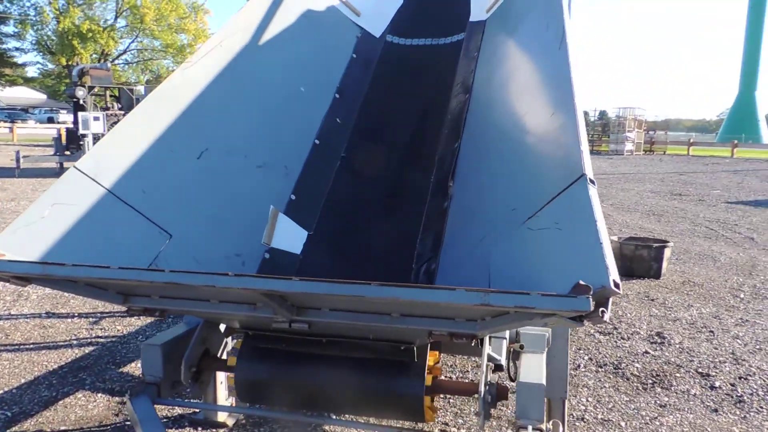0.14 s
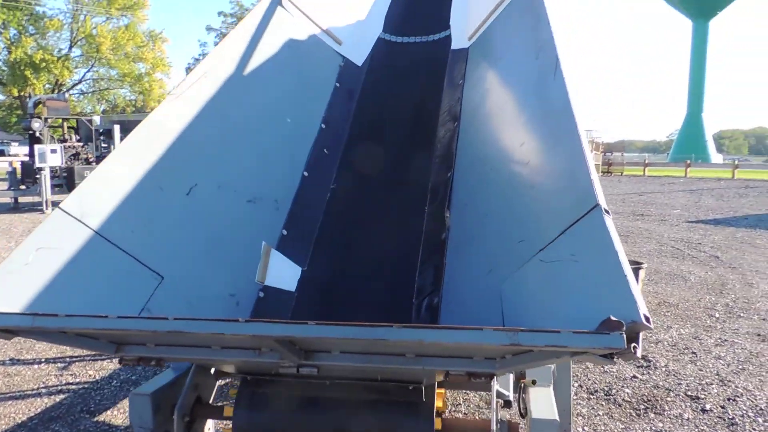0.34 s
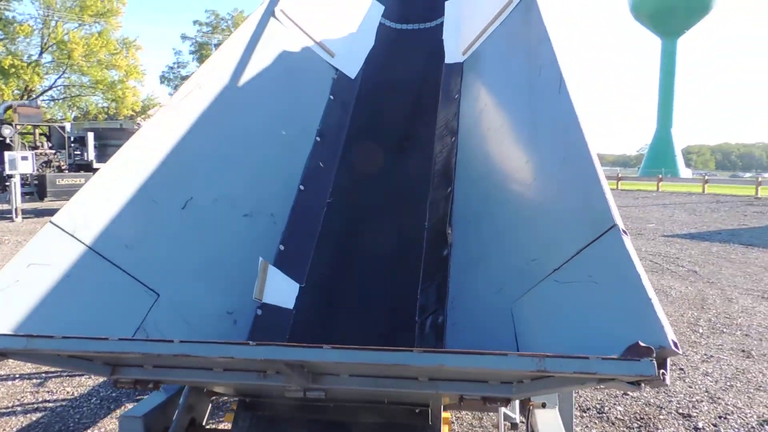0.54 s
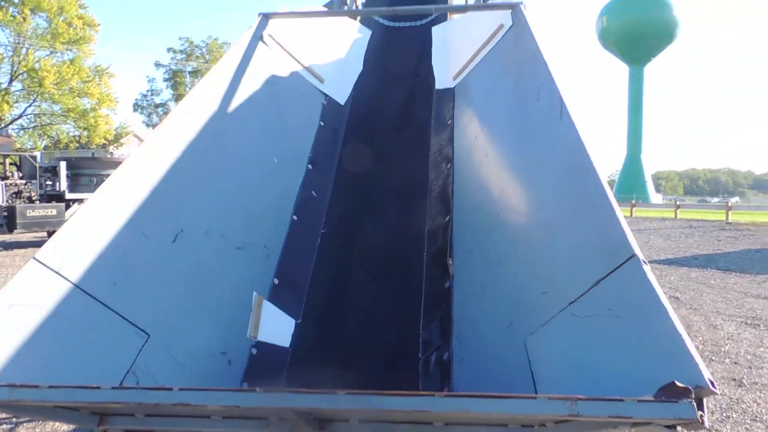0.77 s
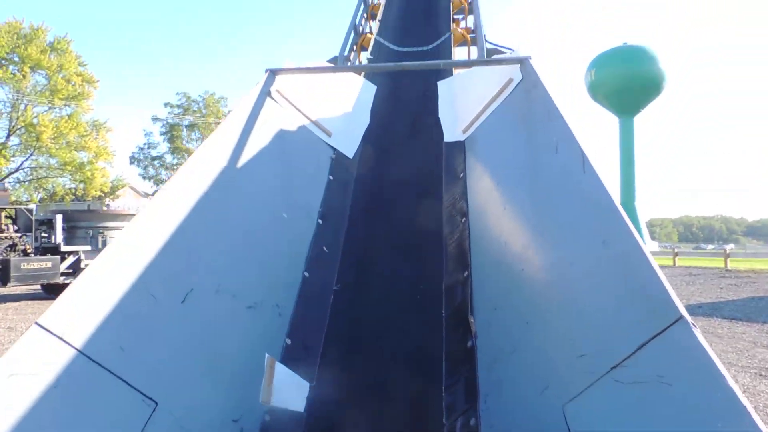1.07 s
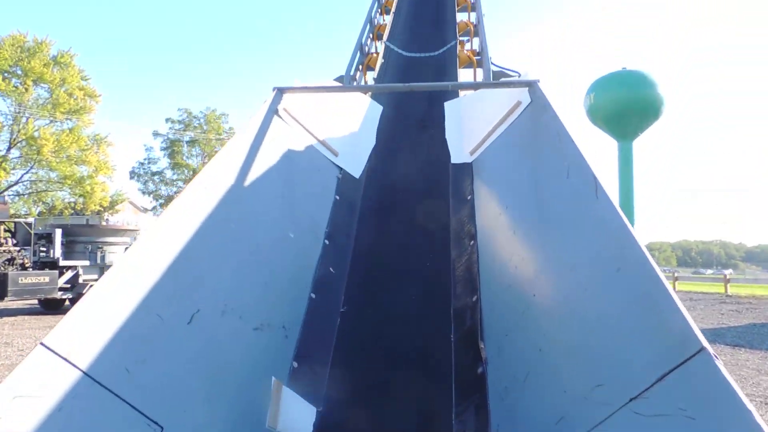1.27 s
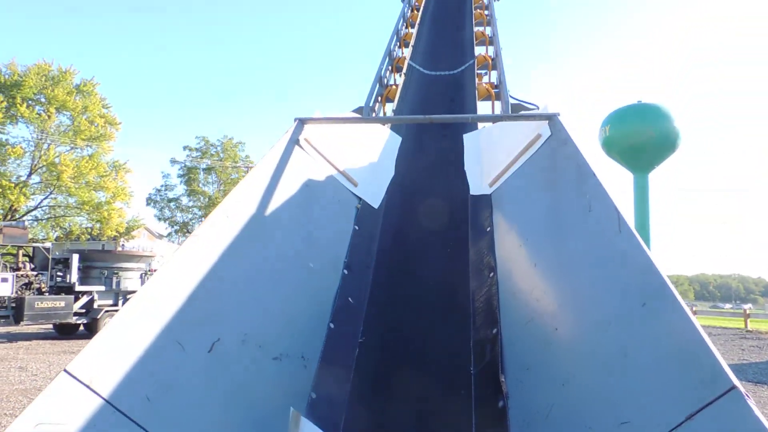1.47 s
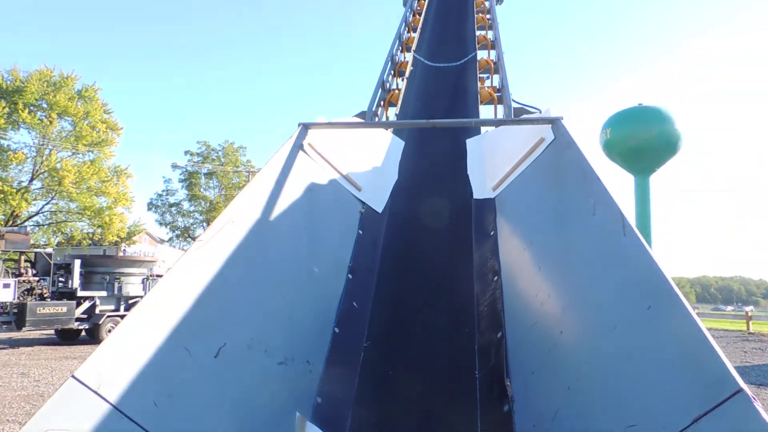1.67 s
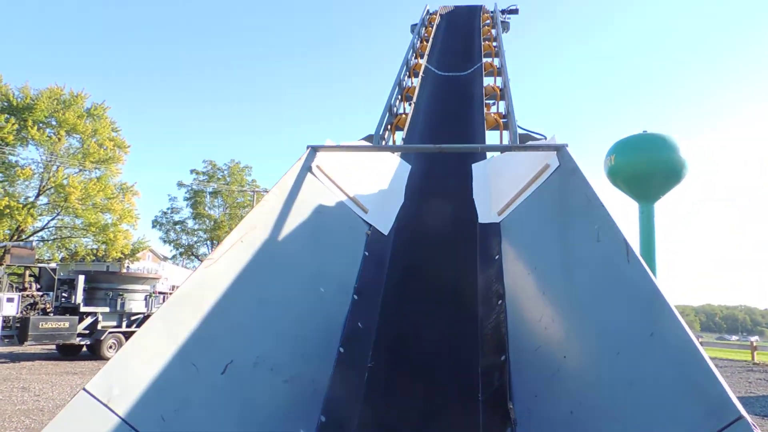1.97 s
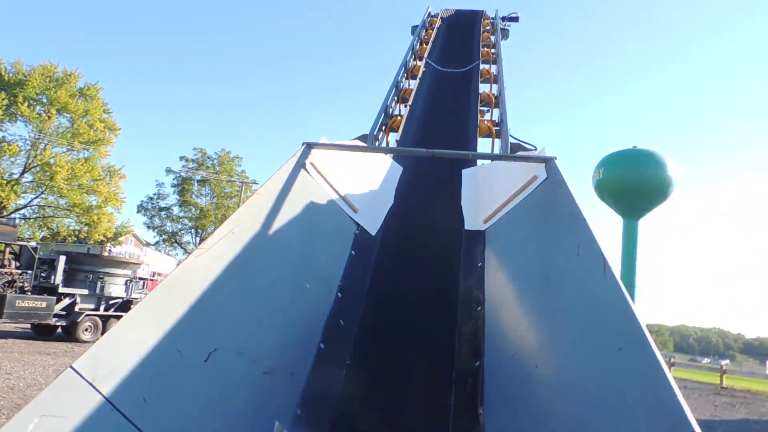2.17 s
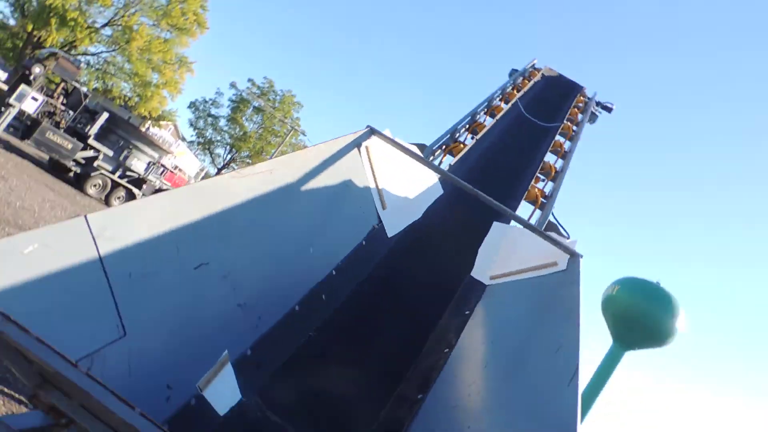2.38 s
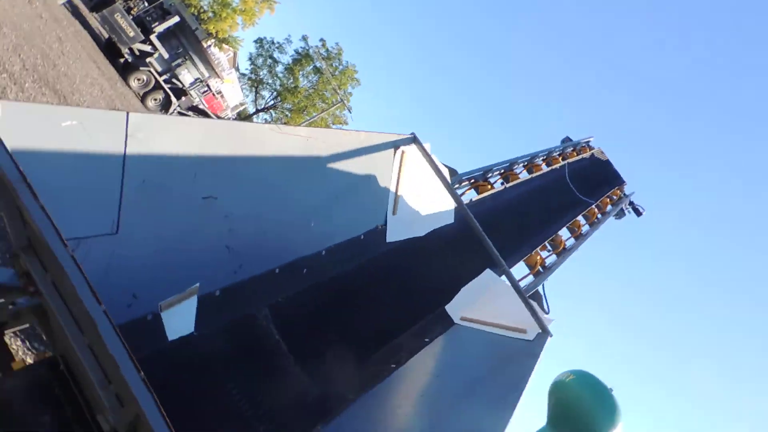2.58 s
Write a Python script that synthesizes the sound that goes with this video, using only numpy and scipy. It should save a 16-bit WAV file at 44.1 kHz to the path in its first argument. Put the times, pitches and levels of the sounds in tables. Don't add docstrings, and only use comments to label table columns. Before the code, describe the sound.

A belt conveyor runs throughout, close and outdoors: a rapid, uneven low engine throb with faint gear whine, rumbling belt, resonant hopper plates and gritty roller hiss. Rumble swells around 1.0 to 1.3 s, then eases. Sharp steel clacks land at about 0.3, 0.75, 1.2, 1.65, 2.1 and 2.55 s, rattling briefly with tiny metallic chimes. Grit ticks cluster at 0.4-0.95 s; fuller soft thuds fall near 2.2 and 2.5 s.

```python
import sys
import numpy as np
from scipy import signal
from scipy.fft import rfft, irfft
from scipy.io import wavfile
from scipy.ndimage import uniform_filter1d

SR = 44100
rng = np.random.default_rng(int(sys.argv[2]) if len(sys.argv) > 2 else 0)


def unload_audio(sound):
    columns = np.transpose(np.atleast_2d(sound))
    steps = np.round(np.clip(columns, -1, 1) * 32767)
    wavfile.write(sys.argv[1], SR, steps.astype(np.int16))


def volts_from_db(level):
    exponent = np.asarray(level, float) / 20
    return 10 ** exponent


N = 120393
T = np.arange(N) / SR


def evened(x):
    return x / np.sqrt(np.mean(x ** 2) + 1e-20)


def read(points, hz):
    f, value = np.transpose(points)
    return np.interp(np.log(hz + 1), np.log(f + 1), value)


def curve(table, col):
    rows = np.array(table)
    return np.interp(T, rows[:, 0], rows[:, col])


def coloured(x, points):
    hz = np.fft.rfftfreq(x.shape[-1], 1 / SR)
    return irfft(rfft(x) * volts_from_db(read(points, hz)), x.shape[-1])


def drift(hz):
    return evened(coloured(rng.standard_normal(N), [(hz, 0), (4 * hz, -40), (40 * hz, -120)]))


def resonate(x, hz, width):
    r = np.exp(-np.pi * width / SR)
    angle = 2 * np.pi * hz / SR
    ringing = signal.lfilter([1, 0, -1], [1, -2 * r * np.cos(angle), r * r], x)
    return np.sqrt(1 - r) * ringing / (2 * np.sin(angle))


def smoothed(x, first, second, axis=-1):
    return uniform_filter1d(uniform_filter1d(x, size=first, axis=axis), size=second, axis=axis)


def noise(points, patchy_db, flicker_db):
    frames = N // 128 + 5
    a, b, c, d, patches = rng.standard_normal((frames, 257, 5)).T
    patches = evened(uniform_filter1d(uniform_filter1d(patches, size=6, axis=0), size=20, axis=1))
    flicker = evened(uniform_filter1d(rng.standard_normal(frames), size=3))
    z = np.array([a + 1j * b, c + 1j * d]) * volts_from_db(patchy_db * patches + flicker_db * flicker)
    raw = signal.istft(z, nperseg=512, noverlap=384)[1][:, :N]
    return evened(coloured(raw, points))


def add(mix, s, sound):
    part = mix[..., max(round(s * SR), 0):][..., :sound.shape[-1]]
    part += sound[..., :part.shape[-1]]


CYCLE_HZ = 28.93
TWIN_GAP, PAIR_AT = .375, .56
PUFF_SKEW, SHAFT_LAG = 2.2, 2.1
WAVER_PER_ORDER, WAVER_MAX = .02, .22
# order (multiple of the engine cycle), level_db
ORDER = [(1, -13.5), (2, 0.5), (3, -2), (4, -23), (5, -0.5), (6, 2.5), (7, -26), (8, -9.5), (9, -9),
         (10, -9.5), (11, -5.5), (12, -14), (13, -12.5), (14, -22.5), (15, -26.5), (16, -20), (17, -23),
         (18, -22), (19, -15.5), (20, -21.5), (21, -16.5), (22, -47.5), (23, -43.5), (24, -10), (25, -30),
         (26, -14.5)]
# start_s, level_db, shading_db (hopper in the way of the upper orders)
NEAR = [
    (0.0, -19, -4.5),
    (0.04, -20.5, -5),
    (0.36, -21, -3),
    (0.39, -21, 2),
    (1.16, -17, -1.5),
    (1.17, -20, 2),
    (2.07, -18, 1),
    (2.2, -18.5, -1.5),
    (2.73, -19, 2.5),
]
# pitch_hz, level_db
WHINE = [
    (1389, -37.5),
    (2026, -45.5),
    (2141, -41),
]


def engine():
    turn = 2 * np.pi * CYCLE_HZ * T
    shade = curve(NEAR, col=2)
    puffs = np.zeros(N)
    for k, db in ORDER:
        side = np.sign(np.cos(np.pi * k * TWIN_GAP))
        waver = min(WAVER_PER_ORDER * k, WAVER_MAX)
        lag = SHAFT_LAG * (k > 7 and k % 2 == 0) + 2 * np.pi * rng.random() * (k > 12)
        wave = np.cos(k * (turn - 2 * np.pi * PAIR_AT) + PUFF_SKEW - lag + waver * drift(hz=3.))
        level = volts_from_db(db + shade * min(k / 10, 1) ** 2 + 4.3 * waver * drift(hz=1.9))
        puffs += side * level * wave
    out = 1.16 * volts_from_db(curve(NEAR, col=1)) * evened(puffs)
    for hz, db in WHINE:
        level = volts_from_db(db + 1.5 + 1.3 * drift(hz=6.0))
        out += level * np.cos(2 * np.pi * hz * T + .5 * drift(hz=1.9))
    return out


# start_s, belt_level_db, hiss_level_db
LOAD = [
    (0.0, -26, -32.5),
    (0.33, -27, -35),
    (0.49, -22.5, -31),
    (0.73, -23, -30),
    (1.01, -19.5, -31),
    (1.34, -24.5, -32.5),
    (1.58, -22.5, -34),
    (2.03, -22.5, -32),
    (2.55, -21.5, -33),
    (2.73, -24.5, -32.5),
]
# pitch_hz, level_db (per Hz)
RUMBLE = [(18, -33), (30, -11), (113, -6.5), (167, -2), (221, -5), (317, -2.5), (418, -14.5), (718, -19),
          (1500, -16.5), (1950, -30), (3300, -120)]
# pitch_hz, width_hz, level_db
PLATES = [
    (592, 100, -1.5),
    (721, 79, 9.5),
    (824.5, 27, 1),
    (900, 41, -76),
]
# pitch_hz, level_db (per Hz)
HISS = [(600, -18), (1100, -10), (2100, -7), (2750, -9), (3200, -15.5), (7000, -17.5), (14150, -22),
        (14450, -70)]


def belt():
    load = curve(LOAD, col=1)
    low = noise(RUMBLE, patchy_db=1.1, flicker_db=.6)
    plates = evened(sum(volts_from_db(db) * resonate(low, hz, width) for hz, width, db in PLATES))
    hits = rng.random(N) < 1200. / SR
    grain_level = volts_from_db(2.2 * np.minimum(rng.exponential(1, N), 3))
    grit = hits * grain_level * rng.choice([-1, 1], (2, N))
    hiss = noise(HISS, patchy_db=1.5, flicker_db=0.86) + 0.24 * evened(coloured(grit, HISS))
    return volts_from_db(load - 6.5) * low + volts_from_db(load - 1) * plates + volts_from_db(curve(LOAD, col=2) + 2.5) * hiss


# start_s, pitch_hz, level_db, length_s
CHIMES = [(0, 7200, -32.5, 0.026), (0, 10600, -41, 0.03), (0.293, 7300, -44, 0.048),
          (0.295, 2470, -33.5, 0.06), (0.743, 7460, -34, 0.037), (.75, 4974, -33, 0.06),
          (0.754, 4400, -46, .03), (1.663, 10800, -38.5, 0.078), (2.571, 10500, -36, 0.04),
          (1.205, 5110, -38, 0.086), (1.195, 7450, -27, .028), (1.207, 8340, -32, .06),
          (1.202, 11200, -33, .015), (1.672, 2510, -30, 0.062), (1.66, 4560, -33.5, 0.091),
          (1.649, 5020, -26.5, 0.068), (1.66, 5216, -36, 0.049), (1.655, 7400, -33, 0.065),
          (1.649, 12170, -32, 0.051), (1.66, 9200, -30, 0.019), (2.11, 7192, -35, .06),
          (2.107, 7650, -29, 0.053), (2.11, 8210, -38, 0.022), (2.113, 4600, -40, 0.1),
          (2.111, 11900, -33, 0.049), (2.575, 5030, -32.5, 0.043), (2.578, 7300, -40.5, .03),
          (2.571, 8200, -36.5, 0.075), (2.58, 8900, -42, .03)]


def chime(start, hz, db, length):
    t = np.arange(0, .25, 1 / SR)
    shaken = evened(resonate(rng.standard_normal((2, len(t))), hz, 160.))
    tone = np.cos(2 * np.pi * (hz * t + rng.random((2, 1)))) + .75 * shaken
    return start, volts_from_db(db + 1.5) * tone * np.minimum(t / 0.0026, 1) * np.exp(-(t / length) ** 2)


def knock(start, db, hz, decay_s, spread):
    t = np.arange(0, .08, 1 / SR)
    narrow = resonate(rng.standard_normal((2, len(t))), hz, spread * hz)
    puff = evened(resonate(narrow, hz, 2 * spread * hz))
    return start, volts_from_db(db) * puff * np.exp(-t / decay_s) * np.minimum(t / (0.096 * decay_s), 1)


# start_s, level_db, pitch_hz
TICKS = [(0.0044, -13.5, 6800), (0.39, -12, 4470), (0.43, -11, 3050), (0.624, -13, 6320),
         (0.6529, -9.5, 5800), (0.6724, -19, 3800), (0.7236, -18, 3540), (0.7944, -9, 4730),
         (0.8274, -12, 3190), (0.8614, -13, 6480), (0.8914, -12, 3350), (0.9363, -8, 3100),
         (2.0677, -15, 3210), (2.1544, -16, 6700), (2.6344, -8, 3120)]


def tick(start, db, hz):
    return knock(start, min(db, -13) - 13, hz, decay_s=.003, spread=.7)


CRACK_DB, WASH_DB = -6.5, -3
RATTLE_S, WASH_T60, BODY_T60 = 0.041, .12, .02
BODY_MODES = 45
CENTRED = 0.62
# start_s, crack_level_db, body_level_db, brightness_db (per octave), blow_s
CLACKS = [
    (0.2871, -8, -14, 0.5, 0.0028),
    (0.742, -8.5, -9.5, 0.5, 0.0066),
    (1.1963, -6.5, -10.5, -1, 0.0056),
    (1.6526, -8.5, -13, -1.5, 0.0056),
    (2.11, -5, -15, -2.5, 0.0036),
    (2.567, -7.5, -12.5, -0.5, 0.0032),
]
# pitch_hz, level_db (per Hz)
CRACK = [(1500, -35), (2400, -8.5), (3200, -6), (4200, -5), (5600, -7.5), (7500, -2), (9500, -14),
         (14000, -18)]


def clack(start, db, body_db, bright_db, blow_s):
    t = np.arange(0, .3, 1 / SR)
    colour = [(hz, d + bright_db * np.log2(hz / 5000)) for hz, d in CRACK]
    burst, shake, wash = rng.standard_normal((3, 2, len(t)))
    lumps = volts_from_db(3.8 * evened(smoothed(rng.standard_normal(len(t)), 20, 12)))
    blow = np.exp(-(t / blow_s) ** 3) * lumps
    crack = evened(coloured(burst, colour)) * blow * np.minimum(t / .0006, 1)

    rattle = lumps * np.exp(-(t / RATTLE_S) ** 2)
    drive = coloured(shake, colour) * (.5 * blow + 0.25 * rattle)
    modes = np.linspace(3000, 12500, BODY_MODES) + rng.uniform(-70, 70, BODY_MODES)
    rings = sum(resonate(drive, hz, 2.2 / BODY_T60) * (-1) ** k for k, hz in enumerate(modes)) / 3
    tail = evened(coloured(wash, colour)) * volts_from_db(WASH_DB - 60 * t / WASH_T60)

    one, other = volts_from_db(db) * (volts_from_db(CRACK_DB) * crack + volts_from_db(body_db) * (rings + tail))
    return start, np.array([one, CENTRED * one + np.sqrt(1 - CENTRED ** 2) * other])


# start_s, level_db, pitch_hz
THUDS = [
    (0.5294, -6, 950),
    (0.9478, -8, 1180),
    (1.6894, -7.5, 1370),
    (2.0699, -7.5, 1380),
    (2.1144, -6, 950),
    (2.1545, -9, 1120),
    (2.2044, 1, 950),
    (2.2244, -15, 904),
    (2.5012, 6, 910),
    (2.6077, -8, 930),
]


def thud(start, db, hz):
    return knock(start, min(db, -6) - 15, hz, decay_s=.022, spread=.6)


# pitch_hz, likeness (0 to 1)
SAME = [(300, 0.97), (700, 0.97), (1200, 0.92), (2000, 0.69), (5000, 0.26), (9000, 0.13), (14000, 0.043)]
# pitch_hz, left_over_right_db
LEFT = [(60, 2.9), (500, 3), (1200, 3.5), (2500, 3), (5000, 4), (9000, 2.5), (13000, 1)]


def stereo(pair):
    hz = np.fft.rfftfreq(N, 1 / SR)
    same = np.clip(read(SAME, hz), 0, 1)
    tilt = volts_from_db(read(LEFT, hz) / 2)
    a, b = rfft(pair)
    return irfft(np.array([a * tilt, (same * a + np.sqrt(1 - same ** 2) * b) / tilt]), N)


def scene():
    pair = belt()
    pair[0] += engine()
    for play, events in [(chime, CHIMES), (tick, TICKS), (clack, CLACKS), (thud, THUDS)]:
        for row in events:
            add(pair, *play(*row))
    return stereo(pair)


def top_cut(x):
    return signal.sosfilt(signal.butter(12, 15450, fs=SR, output="sos"), x)


def record(dry):
    limited = 1.285 * np.tanh(dry / 1.32)
    edge = signal.firwin(255, 15000, window=("kaiser", 9), fs=SR)[None]
    mix = signal.oaconvolve(limited, edge, "same")
    return top_cut(mix)


dry = scene()
out = record(dry)
unload_audio(out)
```